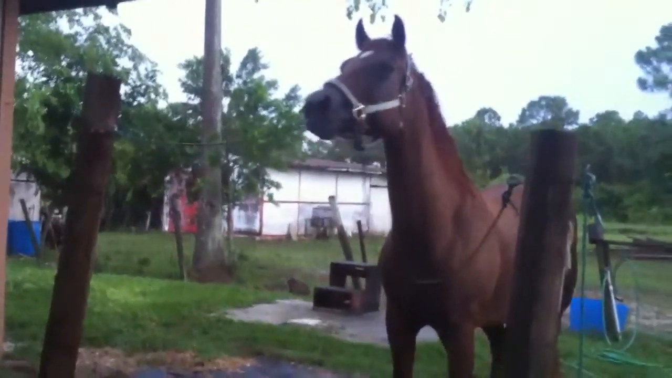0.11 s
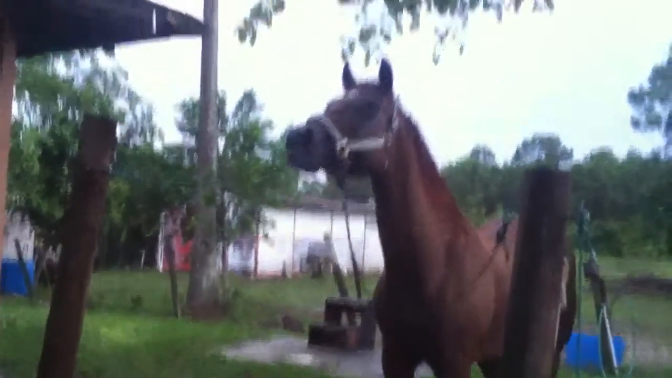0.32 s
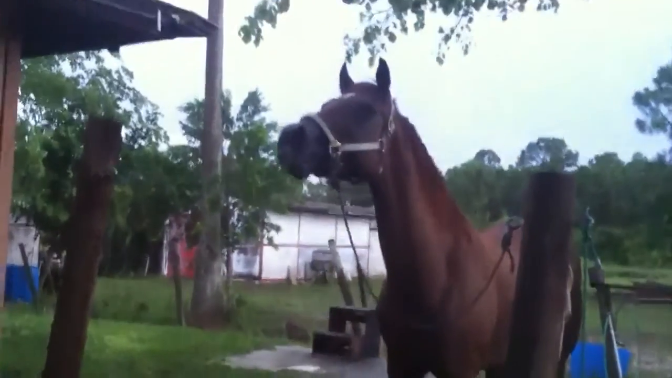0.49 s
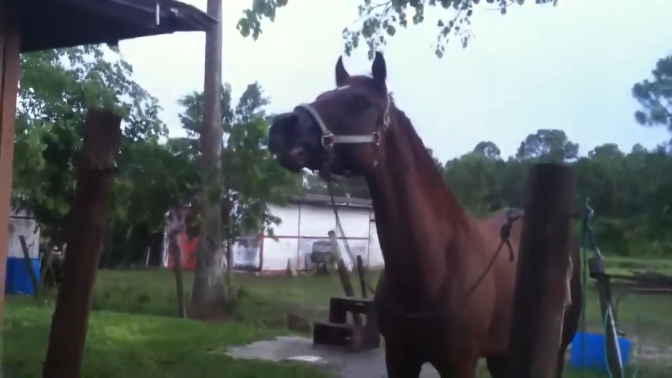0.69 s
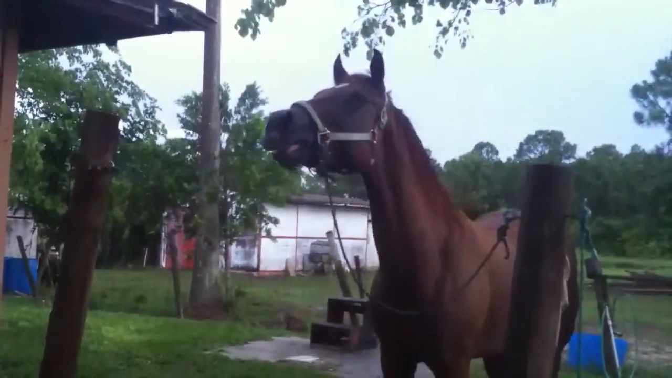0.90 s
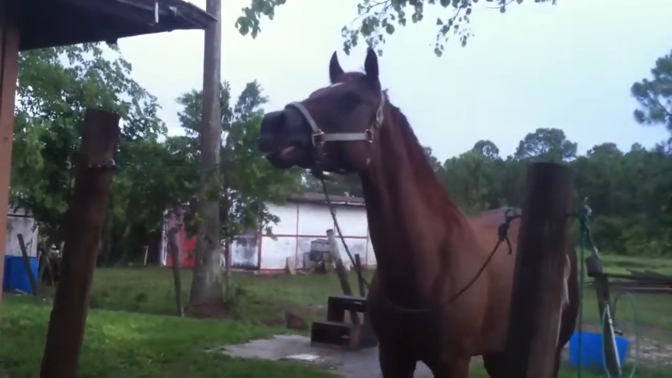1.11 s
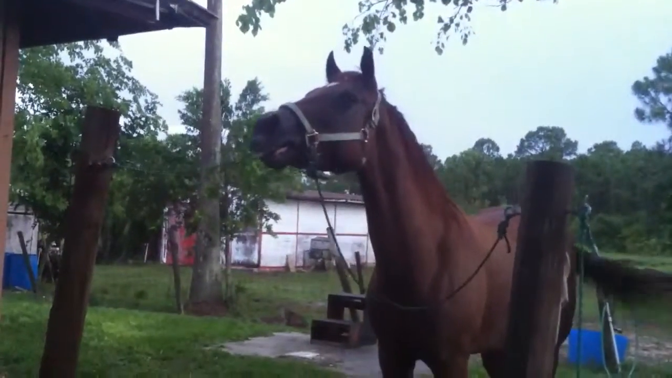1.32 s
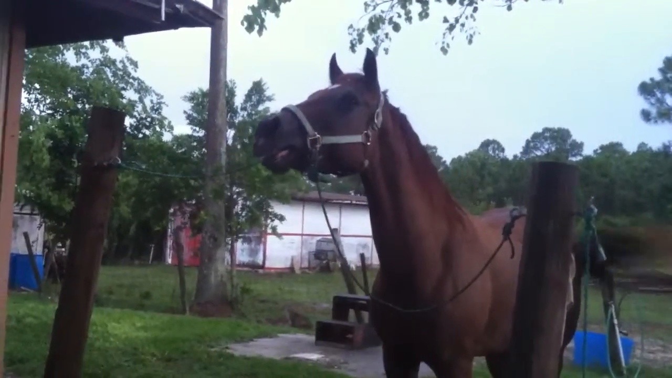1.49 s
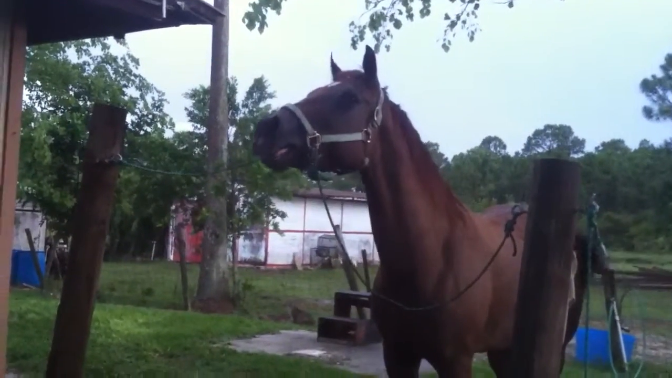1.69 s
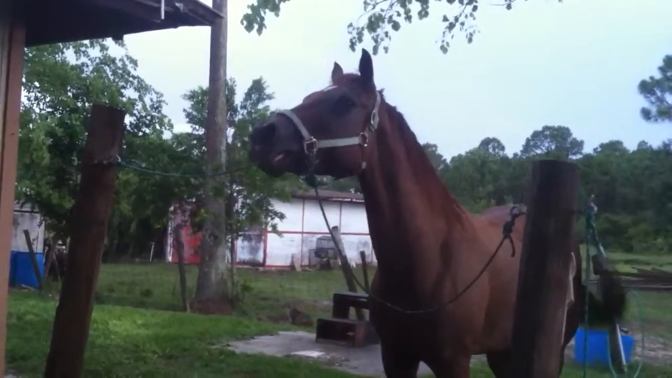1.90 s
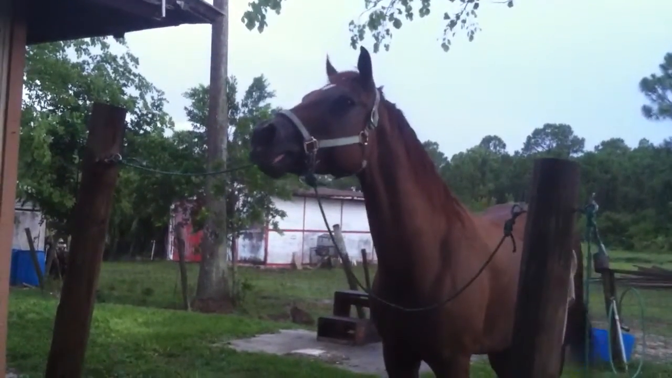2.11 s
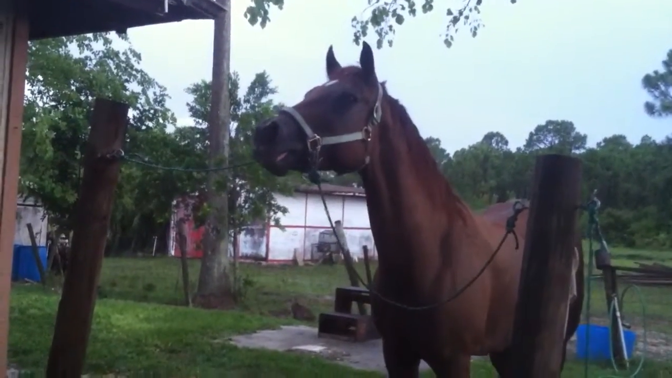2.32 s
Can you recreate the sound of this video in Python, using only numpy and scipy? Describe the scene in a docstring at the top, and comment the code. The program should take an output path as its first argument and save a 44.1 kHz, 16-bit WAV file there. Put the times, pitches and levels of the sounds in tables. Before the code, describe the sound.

One loud horse whinny outdoors: rising squeal, breathy throbbing neigh, rough fading end, faint insects behind.

```python
"""Horse whinny in a yard

A horse whinnies once a few metres away by a barn: a clean rising squeal of flickering overtones breaks into
a hoarse throat whistle (a wavering tone) over a low voice (stacked overtones) that throbs seven times a second.
Filtered noise makes the rushing breath, and slow pulsing makes the growl at the end; barn and trees echo it.
Noise bands make faint air and insects; a knock of decaying sines dies away at the start, a ring clinks late."""
import sys
import numpy as np
from scipy import signal
from scipy.fft import rfft, irfft
from scipy.io import wavfile

SR = 44100
rng = np.random.default_rng(int(sys.argv[2]) if len(sys.argv) > 2 else 0)


def attenuation_scalar(level_db):
    """Turn a level in dB into a linear amplitude multiplier (20 dB per decade)."""
    decades = np.asarray(level_db, float) / 20
    return 10 ** decades


def log_audio(samples):
    """Write samples as a 16-bit WAV file to the path given in sys.argv[1]."""
    # one column per channel
    frames = np.atleast_2d(samples).T
    # limit to full scale, then quantise
    limited = np.clip(frames, -1, 1)
    pcm = np.round(limited * 32767).astype(np.int16)
    wavfile.write(sys.argv[1], SR, pcm)


N = 105840  # samples, 2.4 s

# outdoor air spectrum: freq_hz, response_db
AIR_SPECTRUM = [(24, -54), (40, -15.5), (415, -8.5), (771, -15.5), (1050, -22), (1870, -20), (2200, -8),
                (2870, -16), (3910, -7), (5200, -24.5), (12000, -39.5), (15600, -78), (22000, -120)]
AIR_DB, AIR_WAVER_DB = -52.5, 1.2
# insect bands: centre_hz, width_hz, level_db
INSECT_BANDS = [(1650, 540, -49.5), (4070, 700, -57.5), (6250, 250, -69.5)]
# ringing modes of the knock, struck just before 0 s: freq_hz, level_db, t60_s
KNOCK_MODES = [(233, -32, 0.079), (475, -42, 0.066), (750, -49, 0.099)]

# squeal: start_s, pitch_hz, level_db, overtones_db (re fundamental), roughness (0-1)
SQUEAL_CURVE = [(.06, 1000, -56.5, -27, 0.1), (.08, 1146, -52.5, -30, .05), (.092, 1291, -43, -7, 0.1),
                (.108, 1453, -53, 9, 0), (.14, 1499, -38, 3.5, 0.1), (.165, 1544, -36.5, -4.5, 0.05),
                (.195, 1687, -27.5, -9, 0), (.205, 1680, -44, 9.5, 0.3), (.22, 1752, -27, -5, 0),
                (.24, 1780, -23, -3.5, 0.03), (.255, 1774, -30.5, 5.5, 0.08), (.272, 1594, -26, -7, 0),
                (.292, 1650, -23.5, -5, 0), (.31, 1780, -24, -7, 0.1), (.335, 1850, -16.5, -16, 0.12),
                (.37, 1910, -35, -8.5, 0.8)]
# balance of the squeal's overtones: multiple, level_db
SQUEAL_OVERTONES = [(2, -1.5), (3, -9.5), (4, -10.5), (5, -24), (6, -34.5)]
# phase scatter per overtone number: start_s, scatter_rad
SQUEAL_SCATTER = [(.2, .1), (.27, .45), (.36, .8)]
# tract peaks and dip on the squeal's overtones: centre_hz, width_hz, gain_db
SQUEAL_TRACT = [(4330, 360, 1), (5160, 160, 8), (6880, 720, -14.5)]
BLUR_DB = -3  # gain per overtone number at full roughness

# breath: start_s, mouth_level_db, treble_level_db
BREATH_CURVE = [(.255, -78.5, -49.5), (.282, -36.5, -33.5), (.325, -60.5, -43.5), (.36, -29.5, -29),
                (.41, -25, -22), (.455, -27.5, -30.5), (.54, -26, -21.5), (.596, -28, -28),
                (.67, -24.5, -19.5), (.73, -32, -30), (.798, -24, -20.5), (.862, -31.5, -30.5),
                (.922, -27, -23), (.97, -27, -23), (1.018, -31.5, -29), (1.07, -24, -21.5),
                (1.115, -27.5, -22.5), (1.152, -32.5, -32.5), (1.2, -27, -23.5), (1.25, -22.5, -24.5),
                (1.292, -35.5, -29.5), (1.358, -24, -24), (1.4, -24.5, -26), (1.445, -30, -28.5),
                (1.518, -24, -24.5), (1.59, -28.5, -27.5), (1.652, -24, -25), (1.696, -27, -31),
                (1.745, -27.5, -28), (1.795, -22, -25), (1.836, -34.5, -37.5), (1.88, -25, -32.5),
                (1.928, -26, -32), (1.99, -37.5, -42), (2.04, -22, -32.5), (2.08, -30.5, -36.5),
                (2.135, -38, -40.5), (2.17, -70, -66)]
# throat breath spectrum: freq_hz, response_db (per Hz)
THROAT_SPECTRUM = [(300, -38.5), (380, -11.5), (490, -1), (620, -4), (800, 0.5), (900, -54)]
# mouth breath spectrum: freq_hz, response_db
MOUTH_SPECTRUM = [(750, -32.5), (880, -0.5), (1050, -2), (1250, -1.5), (1450, 0.5), (1800, -5.5),
                  (2300, -11.5), (2700, -23)]
# treble breath spectrum: freq_hz, response_db
TREBLE_SPECTRUM = [(1350, -15.5), (2300, -4.5), (2440, 0.5), (3160, -1.5), (3540, -8), (3960, -4.5),
                   (4680, -8.5), (7200, -18.5), (7880, -26), (10300, -31), (14000, -71)]
# vocal tract peaks: centre_hz, width_hz, start_gain_db, end_gain_db
FORMANTS = [(999, 44, 8, 13), (1134, 86, 3, 18), (1983, 330, 18.5, 8), (2743, 25, 6.5, 19.5),
            (3270, 270, -1, 11), (3796, 200, 3, 8), (4050, 28, 12, 1), (6160, 750, 3.5, 13.5),
            (7030, 70, 11, 1.5)]
# nostril hiss: start_s, level_db
HISS_CURVE = [(.3, -91.5), (1.8, -55), (2.12, -54.5), (2.17, -68)]
# nostril hiss spectrum: freq_hz, response_db
HISS_SPECTRUM = [(6000, -39.5), (7500, 13), (10000, 2), (13000, -8), (15000, -31.5)]
THROAT_DB = (-12.5, -3.5)  # throat band re mouth band (start, end)
BREATH_GATE = 0.16  # share of breath puffed by each low-voice cycle
RASP_DB, RASP_HZ = 1.0, 120  # flutter of the breath

# throat whistle: start_s, level_db
WHISTLE_LEVEL = [(0.34, -21), (0.37, -14), (0.452, -23.5), (0.466, -16), (0.726, -22), (0.788, -18.5),
                 (0.87, -29), (0.91, -15.5), (0.946, -21.5), (1.236, -21.5), (1.256, -28), (1.334, -17),
                 (1.384, -26), (1.414, -29), (1.456, -20.5), (1.512, -16.5), (1.532, -26.5), (1.628, -21),
                 (1.74, -28), (1.782, -19), (1.832, -39), (1.874, -29), (1.954, -38), (1.976, -59),
                 (2.056, -30), (2.128, -66), (2.17, -64)]
# sagging pitch of the whistle: start_s, pitch_hz
WHISTLE_PITCH = [(.34, 2080), (.44, 2103), (.47, 2040), (.8, 2020), (1.0, 1990), (1.3, 1995), (2.17, 2010)]
# overtones of the whistle: multiple, level_db
WHISTLE_OVERTONES = [(2, -22.5), (3, -35)]
# throat resonances that whistle along: centre_hz, width_hz, start_level_db, end_level_db (re whistle)
STRANDS = [(1591, 43, -19.5, 1.5), (1780, 69, -13, 2), (2163, 56, -5.5, -26.5), (2283, 69, -18.5, -19.5)]
WHISTLE_WIDTH_HZ = 55  # speed of its wavering
WHISTLE_STEADY = (1.7, .6)  # steady part of its amplitude before scaling (start, end)
SIDEBAND_DB, STRAND_WAVER_DB = -19, 2.5

# low voice, one swell per shake of the flanks, later swells sag: start_s, pitch_hz, level_db
LOW_CURVE = [(.35, 215.6, -53), (.4, 240.8, -45), (.45, 213, -44.5), (.54, 268.8, -33.5),
             (.597, 229.1, -44), (.645, 262, -31), (.685, 259.4, -29.5), (.728, 222.3, -47.5),
             (.785, 257.7, -30), (.835, 254.2, -34.5), (.866, 227.5, -48), (.92, 248.6, -34),
             (.97, 258.7, -31), (1.018, 227.3, -49.5), (1.06, 254.8, -30.5), (1.11, 255.4, -30),
             (1.157, 245.9, -52), (1.2, 262.3, -33.5), (1.26, 224.8, -27), (1.295, 240.9, -51),
             (1.335, 261, -32), (1.4, 205.5, -28.5), (1.44, 255.7, -46), (1.495, 258.4, -27),
             (1.54, 169.8, -30.5), (1.57, 228, -35.5), (1.592, 250.4, -54), (1.625, 264.8, -30),
             (1.66, 214.5, -23.5), (1.68, 168.3, -39.5), (1.712, 233, -29.5), (1.742, 261.6, -49),
             (1.785, 250.3, -24), (1.815, 173.3, -32), (1.84, 260.9, -29.5), (1.868, 193, -32),
             (1.895, 246.8, -29.5), (1.93, 174.9, -30.5), (1.96, 235.8, -31), (2.0, 236.8, -33),
             (2.04, 191.8, -35.5), (2.085, 213.3, -31), (2.115, 209.8, -33), (2.155, 202.2, -44),
             (2.185, 199.6, -61)]
# overtones of the low voice: multiple, level_db
LOW_OVERTONES = [(2, -9), (3, -18.5), (4, -28.5), (5, -27)]
LOW_JITTER, LOW_SHIMMER = (.018, .1), (.15, .7)  # unevenness of pitch and strength (start, end)

# growl of slow fold flaps: start_s, depth (0-1)
GROWL_DEPTH = [(1.4, 0), (1.7, .35), (1.95, .7), (2.2, .55)]
GROWL_HZ, GROWL_ON_BREATH = 63.23, .25  # flap rate; share of the depth that reaches the breath
# hoarse throat bursts as the call dies: start_s, centre_hz, level_db
BURSTS = [(1.86, 1011, -61), (1.9, 1031, -27.5), (1.95, 1100, -49), (2.01, 1020, -38.5), (2.055, 1137, -34),
          (2.09, 1047, -39)]
# faint band that climbs after the call: start_s, centre_hz, level_db
CLIMB = [(2.16, 3250, -69), (2.26, 3750, -63.5), (2.4, 4150, -58)]

YARD_DB, YARD_T60_S, YARD_GAP_S = -12, .28, .012
FAR_DB, FAR_T60_S = -17.5, 0.98  # tree line
ECHO_HZ = (400, 4500)  # open ground returns little bass, leaves little treble
# nearby reflections cancel these: centre_hz, width_hz, gain_db
NOTCHES = [(614, 40, -6.5), (807, 23, -13)]


def curve(table, column):
    """One table column, drawn as straight lines over time."""
    a = np.array(table, float)
    return np.interp(np.arange(N) / SR, a[:, 0], a[:, column])


def span(table, fade_s=.02):
    """1 inside the table's time span, fading outside."""
    t = np.arange(N) / SR
    fade_in = np.clip((t - table[0][0]) / fade_s + 1, 0, 1)
    return fade_in * np.clip((table[-1][0] - t) / fade_s + 1, 0, 1)


def drift(pair):
    """Change from a start to an end value, slow at first."""
    return pair[0] + (pair[1] - pair[0]) * np.linspace(0, 1, N) ** 2


def unit(x):
    """Scales to rms 1."""
    return x / np.sqrt(np.mean(np.abs(x) ** 2))


def waver(hz):
    """Smooth random wandering of about hz bandwidth, rms 1."""
    lowpass = signal.butter(2, hz, fs=SR, output="sos")
    return unit(signal.sosfilt(lowpass, rng.standard_normal(N)))


def turns(hz):
    """Running phase in radians."""
    return 2 * np.pi * np.cumsum(hz) / SR


def bumps(f, table):
    """Sum of resonance peaks or dips in dB."""
    return sum(db / (1 + (2 * (f - hz) / width) ** 2) for hz, width, db in table)


def shape(x, db_of_hz):
    """Filters x by a dB response."""
    f = np.maximum(np.fft.rfftfreq(N, 1 / SR), 1)
    return irfft(rfft(x) * attenuation_scalar(db_of_hz(f)), N)


def colour(x, points, peaks=()):
    """Shapes x by spectrum points and peaks; rms 1."""
    hz, db = np.array(points, float).T

    def response(f):
        return np.interp(np.log(f), np.log(hz), db, left=-90, right=-120) + bumps(f, peaks)

    return unit(shape(x, response))


def tract(x, points):
    """Breath colour whose formants shift late, as the mouth closes."""
    opened = colour(x, points, [(hz, width, start) for hz, width, start, end in FORMANTS])
    closed = colour(x, points, [(hz, width, end) for hz, width, start, end in FORMANTS])
    return opened + drift((0, 1)) ** 2 * (closed - opened)


def band(hz, width):
    """Narrow noise band: a random complex envelope on a carrier, rms 1."""
    return unit(waver(width / 2) + 1j * waver(width / 2)) * np.exp(1j * turns(hz))


def glide(table, width):
    """Narrow noise band along a curve of centre_hz and level_db."""
    return np.sqrt(2) * band(curve(table, 1), width).real * attenuation_scalar(curve(table, 2)) * span(table)


def air():
    """Outdoor air: coloured noise whose level wavers a little."""
    return colour(rng.standard_normal(N), AIR_SPECTRUM) * attenuation_scalar(AIR_DB + AIR_WAVER_DB * waver(8.5))


def insects():
    """Insects: noise bands that waver in pitch and level."""
    out = np.zeros(N)
    for hz, width, db in INSECT_BANDS:
        level = attenuation_scalar(db + 1.6 * waver(21))
        out = out + level * band(hz * (1 + 0.023 * waver(5.2)), width).real
    return out


def knock():
    """Dull knock: modes that ring down unevenly from 0 s."""
    t = np.arange(N) / SR
    out = np.zeros(N)
    for hz, db, t60 in KNOCK_MODES:
        out = out + attenuation_scalar(db - 60 * t / t60) * np.sin(2 * np.pi * hz * t) * (1 + .5 * waver(53))
    return out


def squeal():
    """Clean high fold vibration with flickering overtones; it roughens before the break."""
    rough = np.clip(curve(SQUEAL_CURVE, 4), 0, 1)
    phase = turns(curve(SQUEAL_CURVE, 1) * (1 + 0.0061 * waver(31))) + 0.51 * rough * waver(200)
    overtones = np.zeros(N)
    for k, db in SQUEAL_OVERTONES:
        level = attenuation_scalar(db + BLUR_DB * k * rough + 4.1 * waver(22))
        scatter = k * curve(SQUEAL_SCATTER, 1) * waver(190)
        overtones = overtones + level * np.cos(k * phase + k * k + scatter) * (1 + 0.26 * waver(88))
    overtones = shape(overtones, lambda f: bumps(f, SQUEAL_TRACT))
    tone = np.cos(phase) + attenuation_scalar(curve(SQUEAL_CURVE, 3)) * overtones
    return np.sqrt(2) * tone * (1 + rough * waver(130)) * attenuation_scalar(curve(SQUEAL_CURVE, 2)) * span(SQUEAL_CURVE)


def breath(low_phase):
    """Turbulent noise through throat, mouth and nostrils, puffed by the low voice's cycles."""
    puff = rng.standard_normal((4, N)) * (1 + BREATH_GATE * np.cos(low_phase))
    puff = puff * attenuation_scalar(RASP_DB * waver(RASP_HZ))
    mouth = colour(puff[0], THROAT_SPECTRUM) * attenuation_scalar(drift(THROAT_DB)) + tract(puff[1], MOUTH_SPECTRUM)
    treble = tract(puff[2], TREBLE_SPECTRUM)
    rush = mouth * attenuation_scalar(curve(BREATH_CURVE, 1)) + treble * attenuation_scalar(curve(BREATH_CURVE, 2))
    hiss = colour(puff[3], HISS_SPECTRUM) * attenuation_scalar(curve(HISS_CURVE, 1))
    return rush * span(BREATH_CURVE) + hiss * span(HISS_CURVE)


def shaken(steady):
    """Complex amplitude wavering around a steady part."""
    wander = waver(WHISTLE_WIDTH_HZ) + 1j * waver(WHISTLE_WIDTH_HZ)
    return (steady + wander) / np.sqrt(2 + steady ** 2)


def throat_whistle(low_phase):
    """Hoarse wavering tone; the low voice beats on it and throat resonances whistle along."""
    carrier = np.exp(1j * turns(curve(WHISTLE_PITCH, 1) * (1 + 0.00302 * waver(16.5))))
    core = shaken(drift(WHISTLE_STEADY)) * carrier
    beats = 2 * attenuation_scalar(SIDEBAND_DB) * np.cos(low_phase) * shaken(0) * span(LOW_CURVE)
    pipe = core * (1 + beats)
    for k, db in WHISTLE_OVERTONES:
        pipe = pipe + attenuation_scalar(db) * shaken(0) * (core / np.abs(core)) ** k
    for hz, width, start_db, end_db in STRANDS:
        level = attenuation_scalar(drift((start_db, end_db)) + STRAND_WAVER_DB * waver(6.6))
        pipe = pipe + level * band(hz * (1 + 0.00812 * waver(7.84)), width) * span(LOW_CURVE)
    return np.sqrt(2) * pipe.real * attenuation_scalar(curve(WHISTLE_LEVEL, 1)) * span(WHISTLE_LEVEL)


def low_voice_phase():
    """Phase of the low fold vibration, its pitch jitter growing."""
    return turns(curve(LOW_CURVE, 1) * (1 + drift(LOW_JITTER) * waver(51.5)))


def low_voice(phase):
    """Low fold vibration: a fundamental and uneven overtones, swelling with each shake."""
    overtones = sum(attenuation_scalar(db) * np.cos(k * phase + k * k) for k, db in LOW_OVERTONES)
    voice = np.cos(phase) + overtones * (1 + 0.42 * waver(35))
    voice = voice * (1 + drift(LOW_SHIMMER) * waver(38))
    return np.sqrt(2) * voice * attenuation_scalar(curve(LOW_CURVE, 2)) * span(LOW_CURVE)


def growl_flaps():
    """Slow, irregular fold flaps that pulse the strength of the call."""
    return curve(GROWL_DEPTH, 1) * np.cos(turns(GROWL_HZ * (1 + 0.19 * waver(22.8))))


def whinny():
    """Low voice, whistle, bursts and breath, all pulsed by the growl."""
    low_phase = low_voice_phase()
    flap = growl_flaps()
    voiced = low_voice(low_phase) + throat_whistle(low_phase) + glide(BURSTS, 152.8)
    return voiced * (1 + flap) + breath(low_phase) * (1 + GROWL_ON_BREATH * flap)


def clink():
    """Halter ring: one decaying sine with a soft onset."""
    start_s, pitch_hz, level_db, t60_s = 2.047, 4408, -37, .26
    since = np.maximum(np.arange(N) / SR - start_s, 0)
    ring = attenuation_scalar(level_db - 60 * since / t60_s) * np.sin(2 * np.pi * pitch_hz * since)
    return ring * np.minimum(since / .006, 1)


def climbing_band():
    """Faint noise band that rises in pitch after the call."""
    return glide(CLIMB, 300)


def echo(horse):
    """Barn and tree-line echo: convolution with two decaying noise tails, band-limited."""
    t = np.arange(SR) / SR
    onset = np.clip(t / YARD_GAP_S - 1, 0, 1)  # silent for one gap, then rising over another
    tail = np.zeros(SR)
    for db, t60 in [(YARD_DB, YARD_T60_S), (FAR_DB, FAR_T60_S)]:
        tail = tail + attenuation_scalar(db) * unit(rng.standard_normal(SR) * attenuation_scalar(-60 * t / t60) * onset)
    tail = signal.sosfilt(signal.butter(2, ECHO_HZ, "band", fs=SR, output="sos"), tail)
    return signal.fftconvolve(horse, tail / np.sqrt(SR))[:N]


def scene():
    """The horse, its echo from barn and trees, and the outdoors."""
    outdoors = air() + insects() + knock() + clink() + climbing_band()
    horse = squeal() + whinny()
    return (horse + echo(horse) + outdoors)[None]


def low_pass(x):
    """Removes everything above the highest recorded frequency."""
    return signal.sosfilt(signal.butter(12, 15070, fs=SR, output="sos"), x)


def record(dry):
    """A phone microphone: dips from nearby reflections, soft peaks, bass cut."""
    notched = shape(dry[0], lambda f: bumps(f, NOTCHES))
    softened = np.tanh(1.178 * notched) / 0.96
    bass_cut = signal.butter(3, 125, "high", fs=SR, output="sos")
    mix = signal.sosfilt(bass_cut, softened)[None]
    return low_pass(mix)


dry = scene()
out = record(dry)
log_audio(out)
```